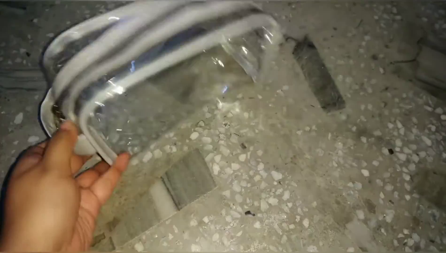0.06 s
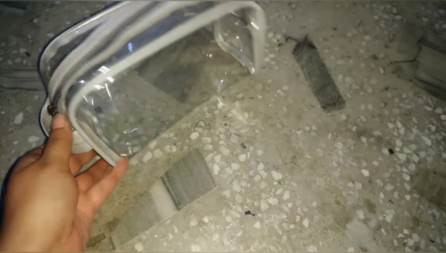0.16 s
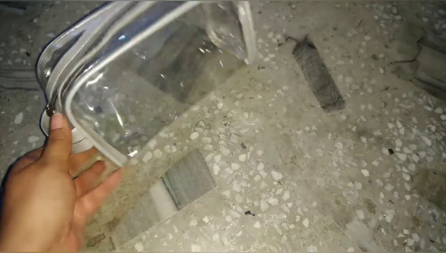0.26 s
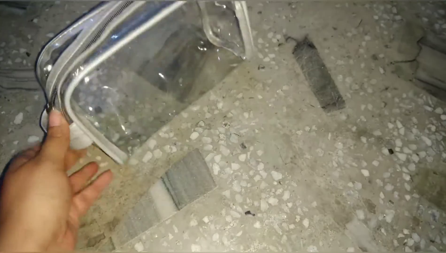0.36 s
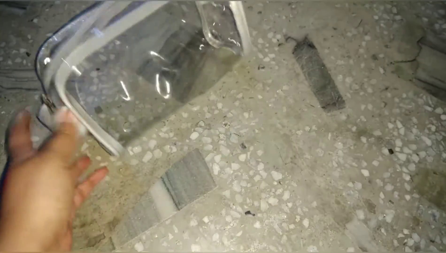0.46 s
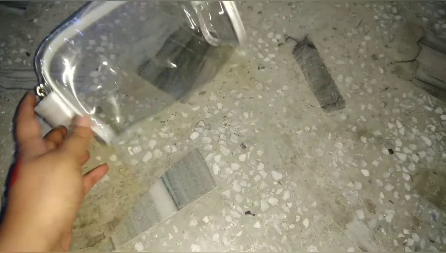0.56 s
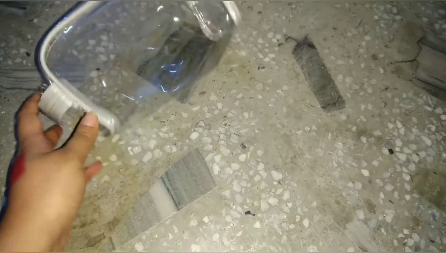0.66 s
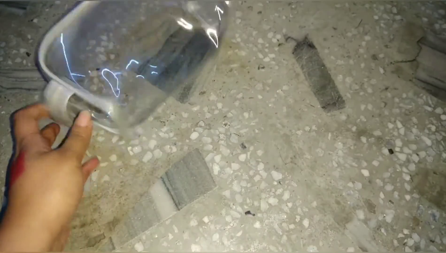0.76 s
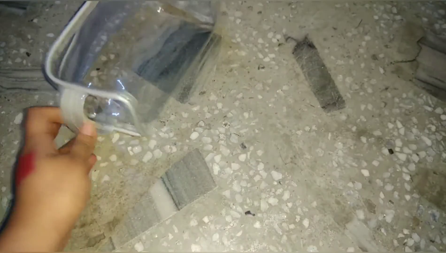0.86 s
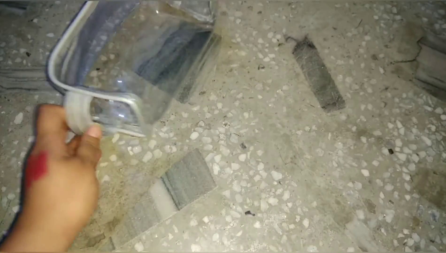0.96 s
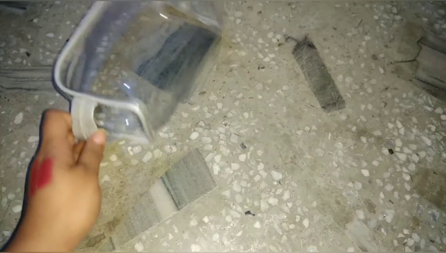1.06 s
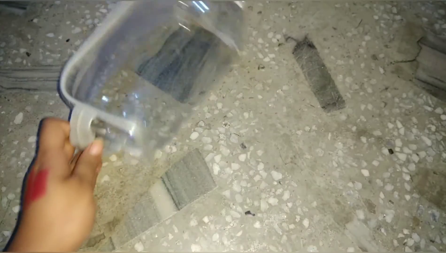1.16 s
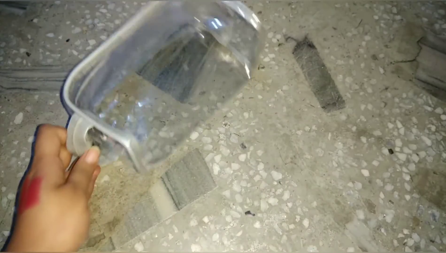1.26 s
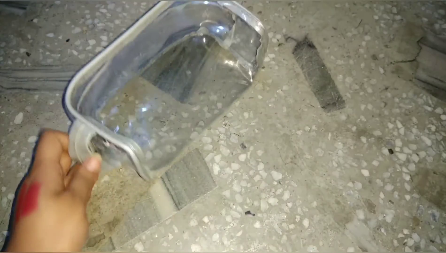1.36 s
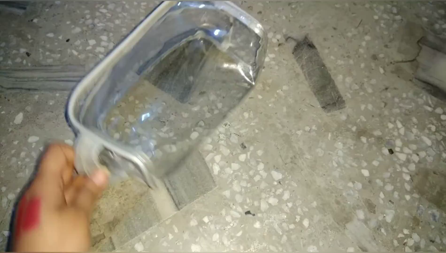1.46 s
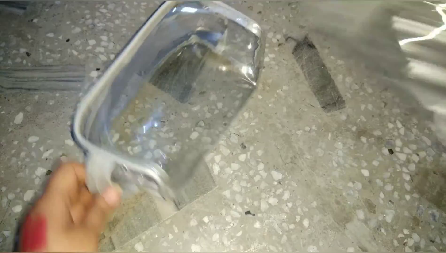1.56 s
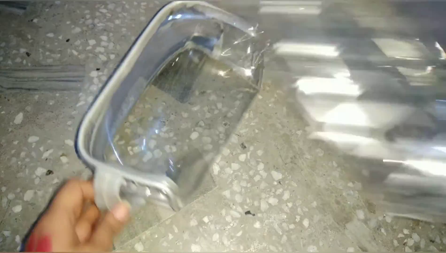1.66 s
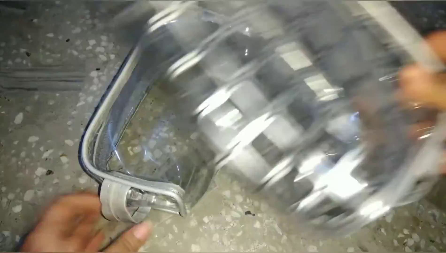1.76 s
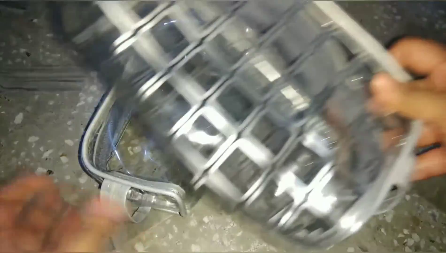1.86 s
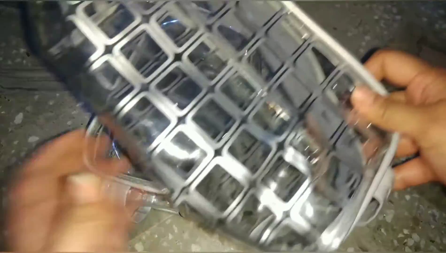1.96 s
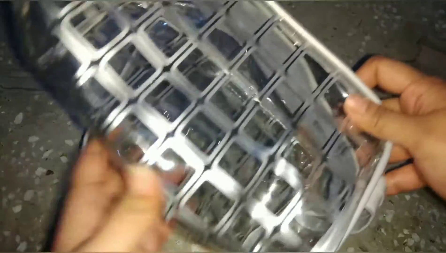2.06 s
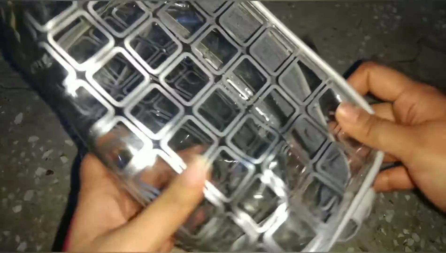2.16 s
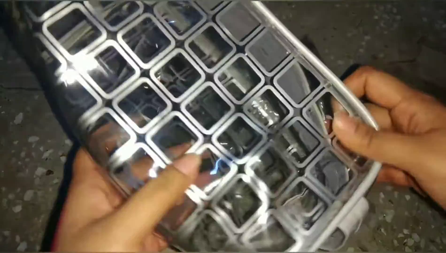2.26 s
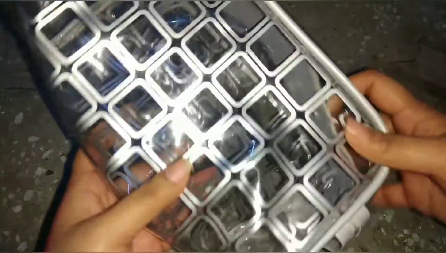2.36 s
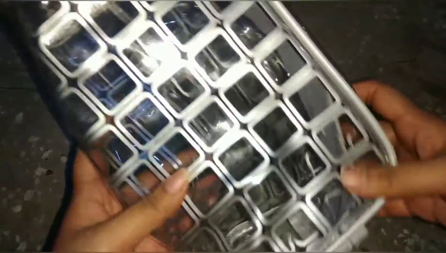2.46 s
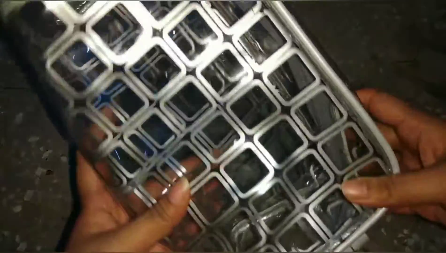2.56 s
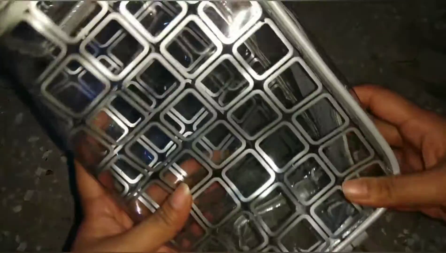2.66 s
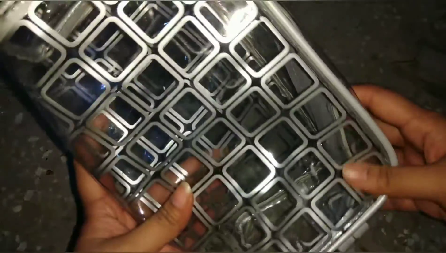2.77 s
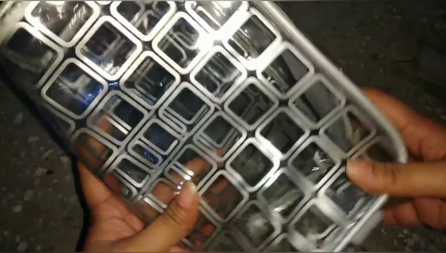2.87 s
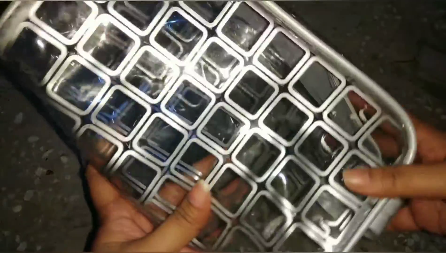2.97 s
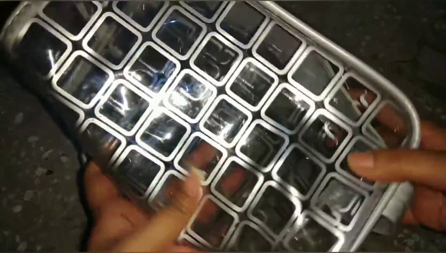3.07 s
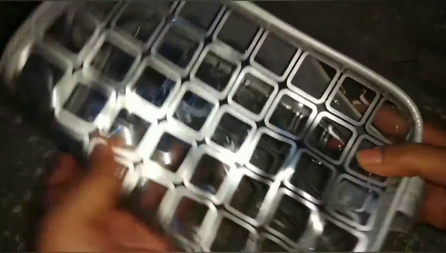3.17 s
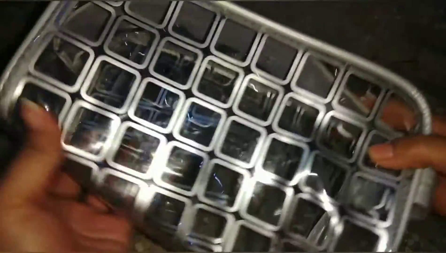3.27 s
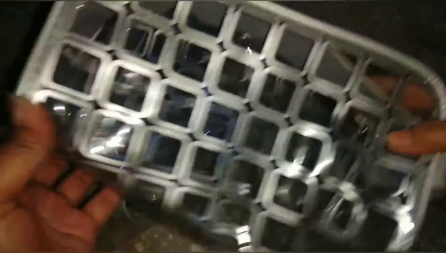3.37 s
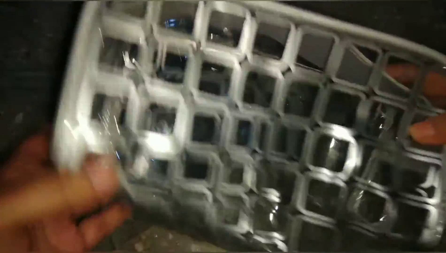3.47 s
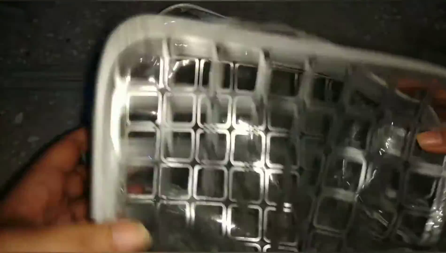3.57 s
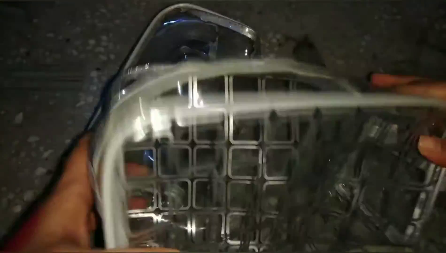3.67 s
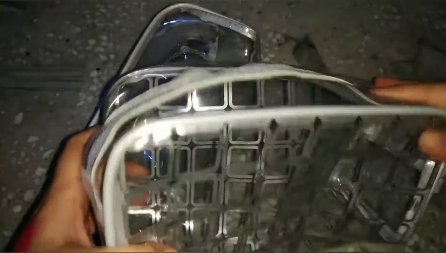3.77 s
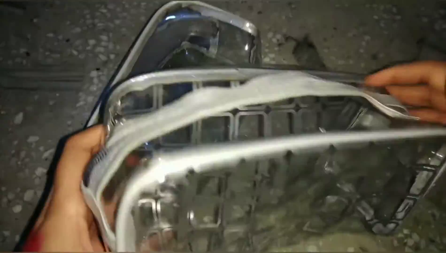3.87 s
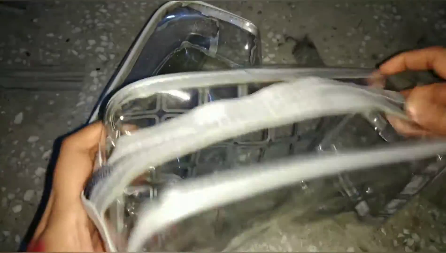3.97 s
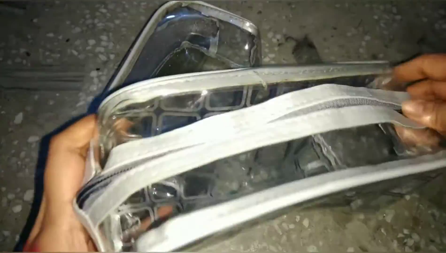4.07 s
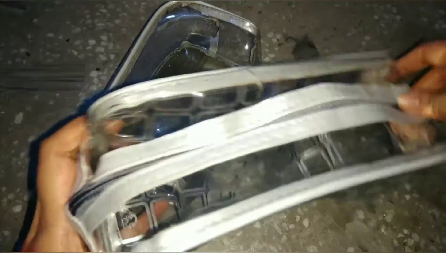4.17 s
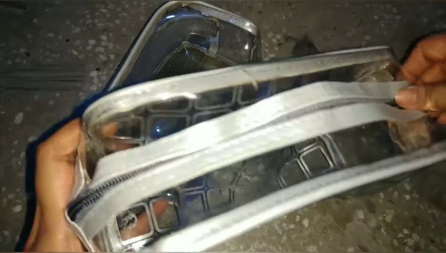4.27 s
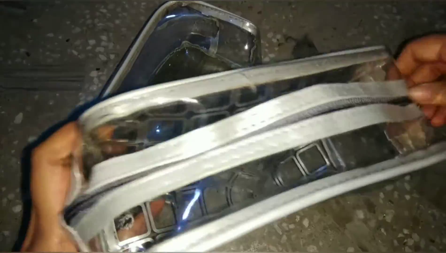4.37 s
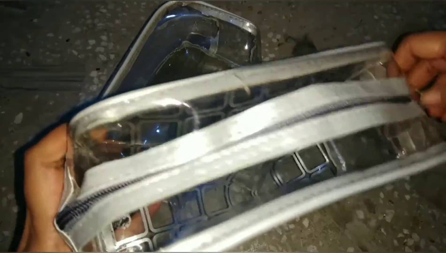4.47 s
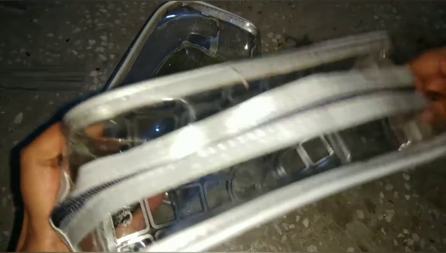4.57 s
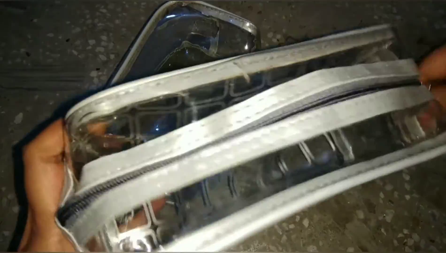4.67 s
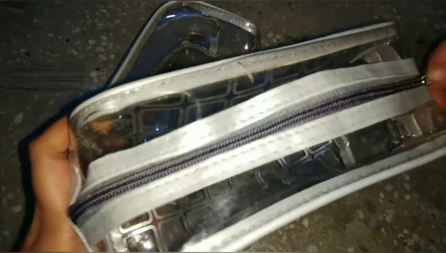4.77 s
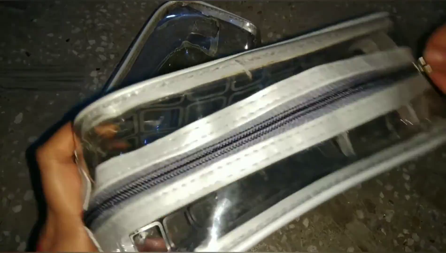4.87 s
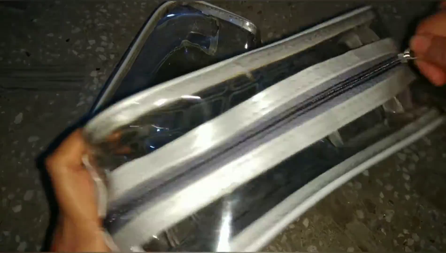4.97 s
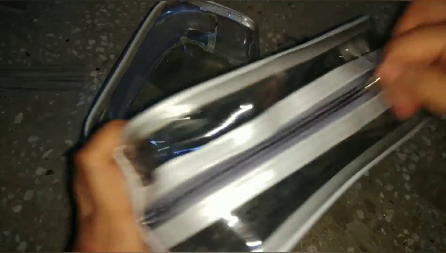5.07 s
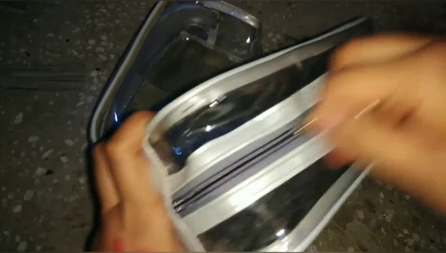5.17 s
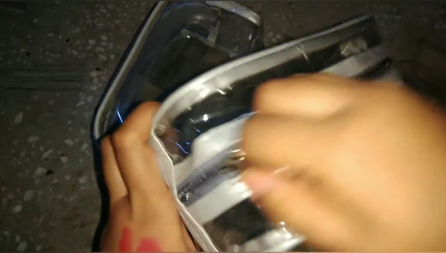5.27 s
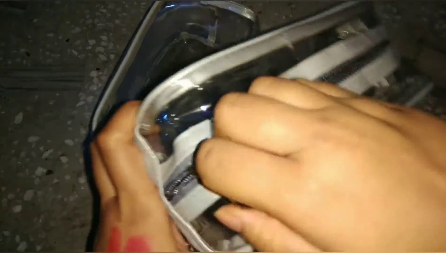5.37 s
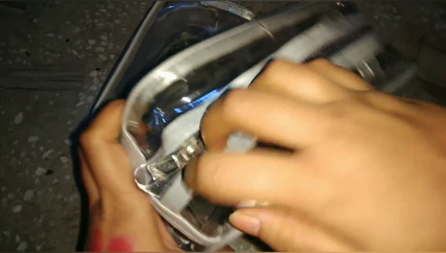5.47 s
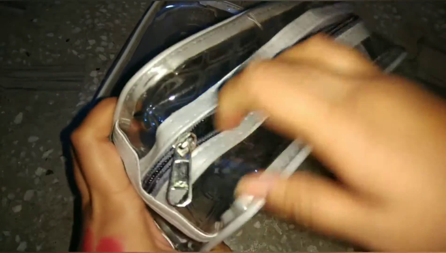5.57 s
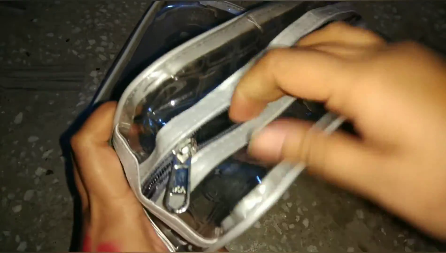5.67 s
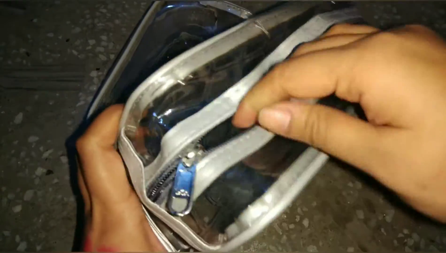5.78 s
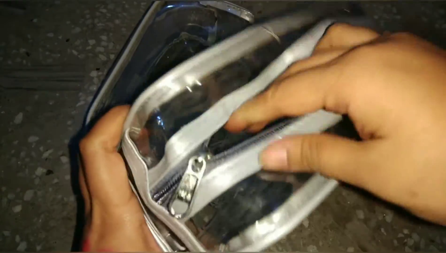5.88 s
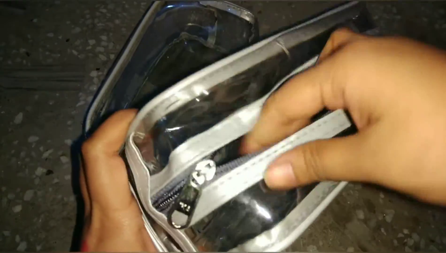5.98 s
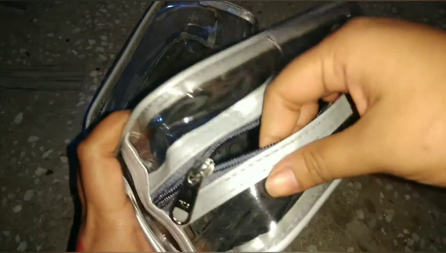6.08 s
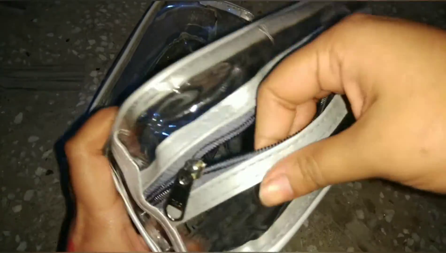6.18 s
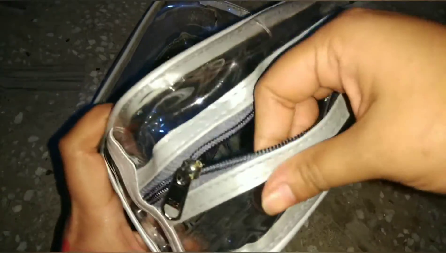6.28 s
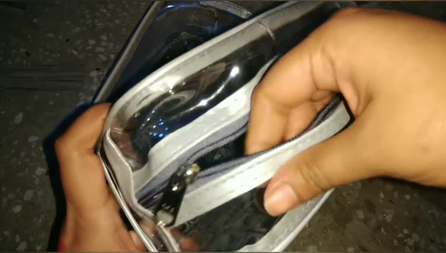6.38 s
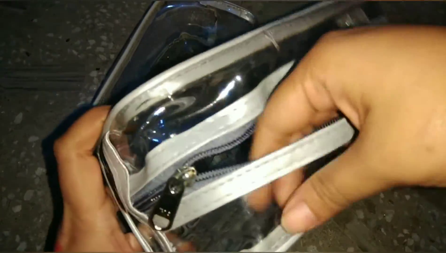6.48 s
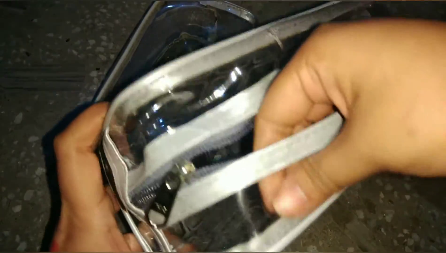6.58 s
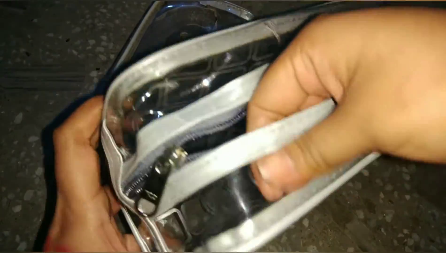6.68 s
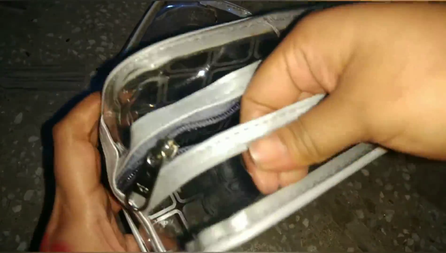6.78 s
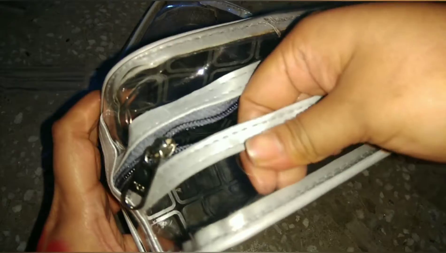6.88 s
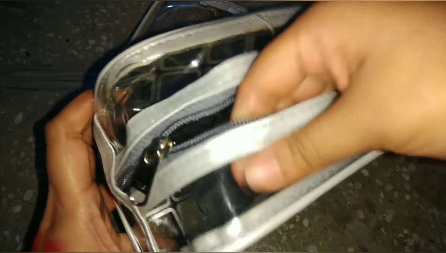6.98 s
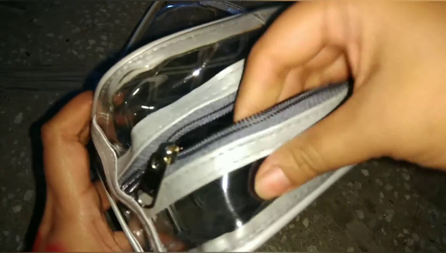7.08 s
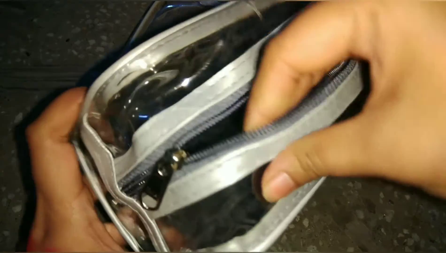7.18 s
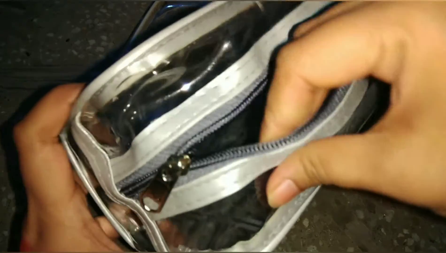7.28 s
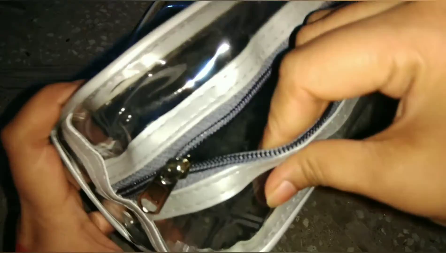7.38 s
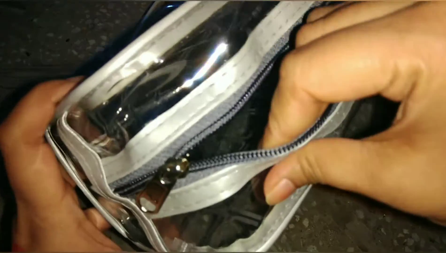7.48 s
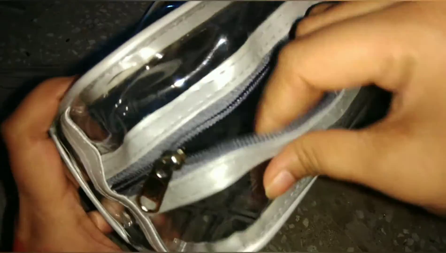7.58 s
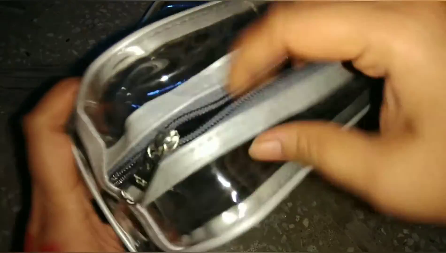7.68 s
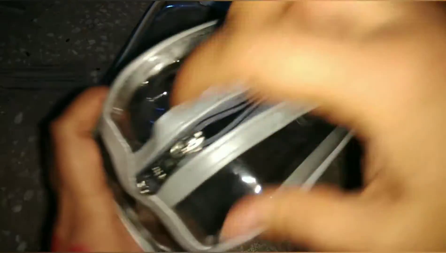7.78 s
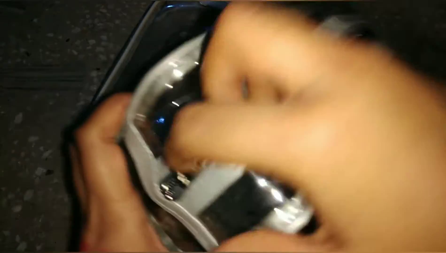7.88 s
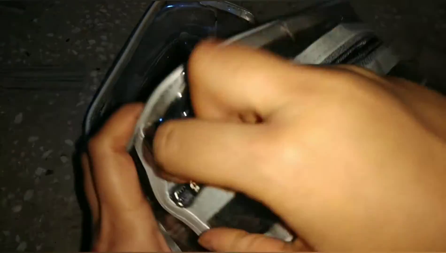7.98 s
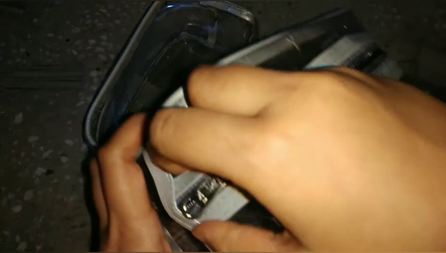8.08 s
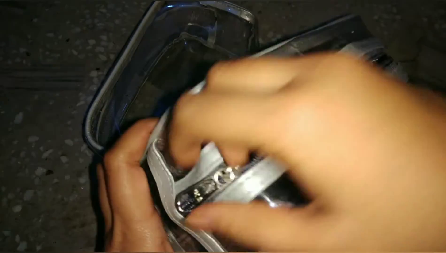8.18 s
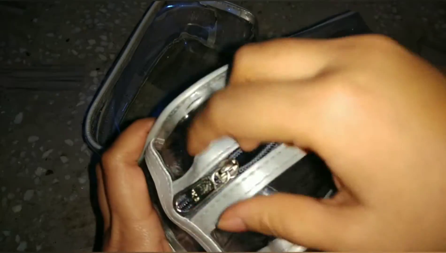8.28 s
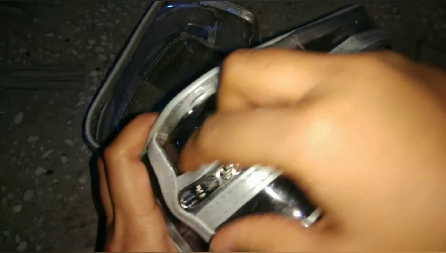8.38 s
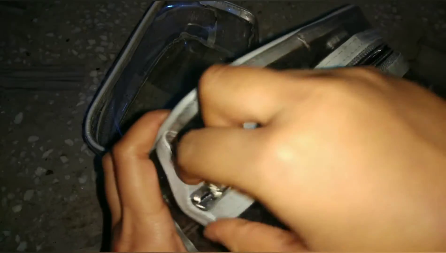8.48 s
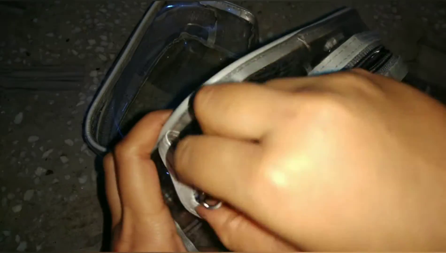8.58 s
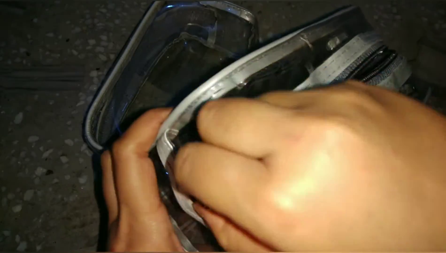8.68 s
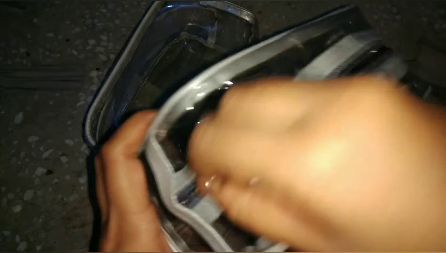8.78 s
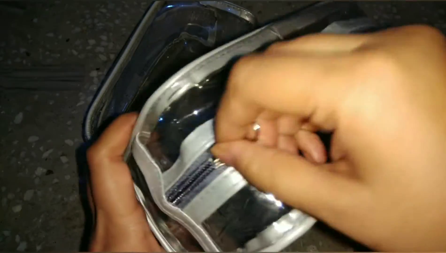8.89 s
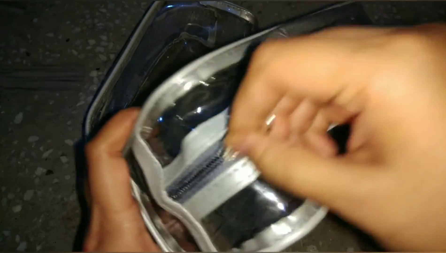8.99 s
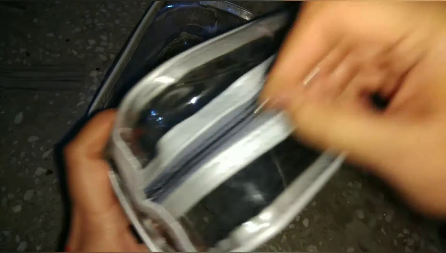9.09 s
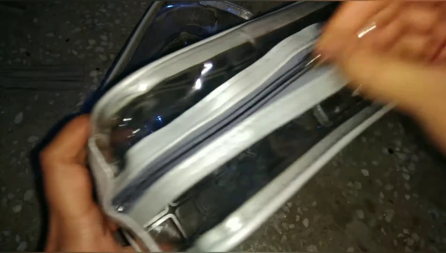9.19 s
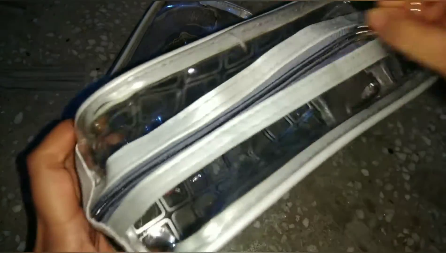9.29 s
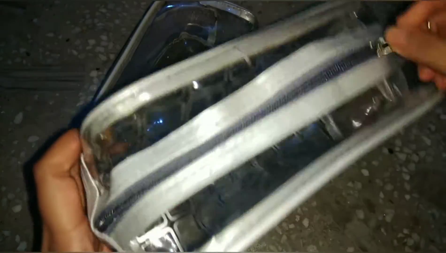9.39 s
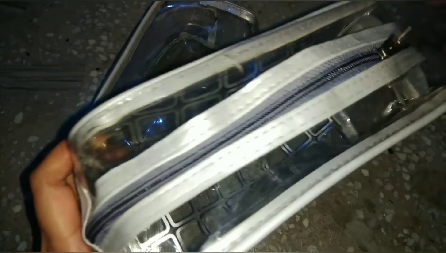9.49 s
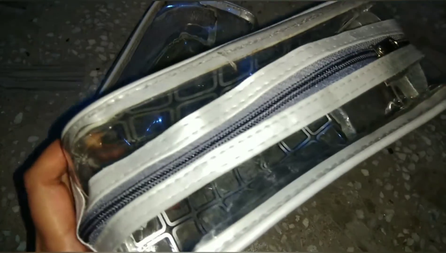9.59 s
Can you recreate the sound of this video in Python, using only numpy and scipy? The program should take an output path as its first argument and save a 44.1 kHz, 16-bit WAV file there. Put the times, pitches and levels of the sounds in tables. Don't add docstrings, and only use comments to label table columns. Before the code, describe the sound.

Very close in a quiet small room, stiff plastic film crackles as a pouch is put down, then rustles more softly as another is turned over. A metal pull tab clinks, the zip buzzes open in a brief rising pull, fingers tap and crease the walls, and a second quick zip buzz closes it near the end. Stereo phone pickup, with the background sinking almost to silence between moves.

```python
import sys
import numpy as np
from scipy import signal
from scipy.fft import rfft, irfft, next_fast_len
from scipy.io import wavfile
from scipy.ndimage import uniform_filter1d, map_coordinates

SR = 44100
rng = np.random.default_rng(int(sys.argv[2]) if len(sys.argv) > 2 else 0)


def how_loud(loudness_db):
    steps = np.asarray(loudness_db, float) / 20
    return 10 ** steps


def master(y):
    cut = np.clip(np.atleast_2d(y).T, -1, 1)
    pcm = np.round(cut * 32767)
    wavfile.write(sys.argv[1], SR, pcm.astype(np.int16))


N = 425565
TIME = np.arange(N) / SR
FAST = next_fast_len(N)


def level(x, db=0):
    return x * how_loud(db) / np.sqrt(np.mean(x ** 2))


def colour(x, points, weight=lambda hz: 1):
    hz = np.arange(FAST // 2 + 1) * SR / FAST + 1e-3
    at, db = np.transpose(points)
    gain = how_loud(np.interp(np.log(hz), np.log(at), db, -120, -120))
    return irfft(rfft(x, FAST) * gain * weight(hz), FAST)[..., :N]


def resonance(x, hz, width):
    return signal.lfilter(*signal.iirpeak(min(hz, .45 * SR), max(hz / width, .3), fs=SR), x)


def pair(alike_hz, apart=0.9):
    mid, side = rng.standard_normal((2, N))
    side = signal.sosfilt(signal.butter(1, alike_hz, "high", fs=SR, output="sos"), side)
    return mid + apart * side * np.array([[1], [-1]])


def sides(pan_db):
    return how_loud(np.array([pan_db, -pan_db]) / 2).reshape(2, -1)


def walk(rate):
    k = int(SR / rate)
    steps = np.repeat(rng.standard_normal(N // k + 1), k)
    return 1.2 * uniform_filter1d(steps, k)[:N]


def add(out, x, s):
    i = int(s * SR)
    out[:, i:i + x.shape[1]] += x[:, :N - i]


# t/s, left minus right level/dB
HOLDING_SIDE = [(0, -1), (.5, 11), (.8, 1), (1.7, 5), (2.1, 8), (2.9, 11), (3.2, 9), (4.0, 6.5), (4.55, 7),
                (4.9, 4), (5.55, 0), (5.9, 3), (7.5, 1.5), (8.3, -4.5), (8.6, 1), (9.3, 0.5), (9.65, 15.5)]


def held(s):
    return np.interp(s, *np.transpose(HOLDING_SIDE))


# f/Hz, level/dB per Hz
DRONE_SPECTRUM = [(18, -71), (30, -30), (69, -24), (92, -13.5), (119, -15), (135, -9), (165, -7), (190, 0),
                  (212, -3), (226, -14.5), (420, -26.5), (550, -68.5)]
# t/s, level/dB
GATE_OPENING = [(0.0, -68), (0.54, -69.5), (1.15, -67.5), (3.17, -71.5), (4.7, -69.5), (5.4, -62.5),
                (5.64, -69), (6.42, -72.5), (8.19, -66.5), (8.38, -74.5), (9.14, -67.5), (9.65, -69.5)]


def drone(flex_db):
    gate_slope, gate_s, trim_db = 0.19, 0.028, 6.5
    air = pair(70, apart=.5)
    handling_db = uniform_filter1d(flex_db, int(gate_s * SR)) + 68.5
    db = np.interp(TIME, *np.transpose(GATE_OPENING)) + gate_slope * handling_db
    waver_db = 1.4 * walk(12)
    return level(colour(air, DRONE_SPECTRUM)) * sides(-2.5) * how_loud(db + trim_db + waver_db)


# t/s of the peak, crackle level/dB, rise/s, fall/s, wall flex against crackle level/dB
SETTING_DOWN = [
    (0.0, -46.5, .1, 0.12, -5.5),
    (.2, -53.5, 0.11, .1, -2),
    (.38, -57, 0.064, 0.12, 2),
    (.54, -55, 0.12, 0.55, -2.5),
    (0.734, -40.5, 0.038, 0.13, -1.5),
    (.8, -48.5, 0.092, 0.35, -1),
    (1.05, -38, 0.13, 0.14, -21),
    (1.17, -42.5, 0.32, 0.18, -5.5),
    (1.519, -41, 0.38, 0.28, -8),
    (1.9, -75, 0.14, 0.66, 5),
]
TURNING_OVER = [(2.17, -62, 0.22, 0.32, -0.5), (2.32, -67.5, 0.048, 0.085, 7),
                (2.499, -78, 0.095, 0.064, 10), (3.0, -64.5, 0.057, 0.08, -5),
                (3.177, -60, 0.056, 0.07, -5), (3.3, -69.5, 0.33, 0.1, -6.5),
                (3.45, -71, 0.078, 0.078, -1.5), (3.54, -61.5, 0.058, 0.14, -3.5),
                (3.62, -56.5, 0.092, 0.1, -9), (3.718, -59.5, .02, 0.033, -10),
                (3.81, -46.5, 0.06, 0.073, -7.5), (3.9, -57.5, 0.083, 0.25, -5),
                (4.051, -54, 0.046, 0.14, -6.5), (4.142, -51.5, 0.023, .13, -7),
                (4.37, -52.5, 0.12, 0.085, -4), (4.58, -55, 0.16, 0.2, -0.5), (4.72, -63, .1, .09, 3)]
FINGERING = [(5.33, -49.5, 0.57, 0.069, 7.5), (5.43, -48.5, 0.11, 0.12, -1.5),
             (5.539, -50.5, 0.077, 0.21, 1), (5.922, -57.5, 0.31, 0.17, 1), (6.222, -64.5, 0.13, 0.11, 5),
             (6.434, -50, 0.049, 0.04, -2), (6.47, -60, 0.13, .12, -1.5), (6.671, -83, .03, 0.08, 1),
             (6.95, -55.5, 0.049, 0.1, -6.5), (7.0, -51.5, 0.08, 0.1, -5), (7.2, -63.5, 0.25, 0.095, -3.5),
             (7.619, -55.5, 0.036, 0.16, -3), (7.7, -70.5, 0.079, 0.12, 16.5),
             (7.869, -62, 0.094, 0.11, -2), (8.119, -66, 0.095, 0.091, -1.5),
             (8.21, -67.5, 0.12, 0.053, -4.5), (8.397, -67, 0.048, 0.12, -6), (8.561, -52, 0.046, 0.047, 3),
             (8.64, -52.5, .04, 0.041, -1.5), (8.72, -54, 0.078, 0.083, 5.5), (8.83, -65.5, 0.11, 0.097, 4),
             (9.38, -59, 0.67, 0.071, 6.5), (9.46, -52, 0.027, 0.095, 2), (9.6, -64.5, 0.59, 0.12, -3.5)]


def hands(shake_db, on):
    swell_db, swell_curve = 20, 1.55
    flex_slope, rustle_slope = 0.71, 0.92
    soft_loss = 0.28
    still_db, shake_share_db = np.array([-104, -110, -105]), np.array([[-16.], [-7.5], [0]])
    coarse = TIME[::64]
    shaken = (on * how_loud(2 * uniform_filter1d(shake_db, size=3000)))[::64]
    power = how_loud(2 * still_db)[:, None] + shaken * how_loud(2 * shake_share_db)
    for moves, rustle_db in zip((SETTING_DOWN, TURNING_OVER, FINGERING), (-7, -6, -3)):
        for s, db, rise, fall, flex_db in moves:
            late = coarse - s
            pace = np.where(late < 0, max(rise, .01), max(fall, .01))
            fade = swell_db * np.abs(late / pace) ** swell_curve
            flex = db + flex_db - flex_slope * fade
            rustle = db + rustle_db + soft_loss * (db + 49.0) - rustle_slope * fade
            power += how_loud(2 * np.array([flex, rustle, db - fade]))
    return [np.interp(TIME, coarse, 10 * np.log10(p)) for p in power]


def patchy(x, depth_db, band_hz, hold_s):
    hz, s, cells = signal.stft(x, SR, nperseg=512)
    field = rng.standard_normal((200, 800))
    at = np.meshgrid(hz / band_hz, s / hold_s, indexing="ij")
    gain = how_loud(depth_db * map_coordinates(field, at, order=1, mode="wrap"))
    return signal.istft(cells * gain, SR, nperseg=512)[1][:, :N]


# f/Hz, level/dB per Hz
FILM_SPECTRUM = [(150, -34), (260, 0.5), (658, -0.5), (836, -2), (1430, -12.5), (1810, -9.5), (2470, -11.5),
                 (2740, -11), (3360, -12), (4070, -11.5), (6470, -12.5), (12600, -3), (15800, -8)]


def film(layers_db, tooth):
    slips = (rng.random(N) < 600 / SR) * how_loud(np.minimum(4.7 * rng.exponential(size=N), 11))
    grain = 18.0 + signal.lfilter([1], [1, -np.exp(-1 / (0.014 * SR))], slips)
    low, high = (lambda hz, e=e: 1 / (1 + (hz / e) ** 9) for e in (994, 6700))
    shares = [low, lambda hz: high(hz) - low(hz), lambda hz: 1 - high(hz)]
    out = 0
    for share, db, trim_db, pan in zip(shares, layers_db, (-3, 2.5, 0), (0.055, 0.36, 1)):
        noise = pair(1220, apart=1.0) * level(grain) * tooth
        layer = colour(noise, FILM_SPECTRUM, lambda hz: np.sqrt(share(hz)))
        out = out + level(layer, trim_db) * how_loud(db + 0.98 * walk(25)) * sides(pan * held(TIME))
    return patchy(out, depth_db=4.5, band_hz=130, hold_s=.05)


def crinkles(flex_db, on):
    count, middle_hz, turns = 1100, 1300, 2
    out, t = np.zeros((2, N)), TIME[:500]
    for when, big, pitch, pan in rng.random((count, 4)):
        i = int(when * N)
        hz = middle_hz * 2 ** (2.4 * pitch - 1.1)
        db = flex_db[i] - 3 * np.log(1 - .95 * big) - 3 * np.log2(hz / middle_hz)
        pop = np.sin(2 * np.pi * hz * t) * np.exp(-t * hz / turns)
        add(out, pop * how_loud(db) * (1 - on[i]) * sides(6 * pan - 3), i / SR)
    return signal.sosfilt(signal.butter(2, 400, "high", fs=SR, output="sos"), out)


# t/s, peak level/dB, wall pitch f/Hz, snap against thud level/dB
WALL_TAPS = [(0.164, -38.5, 314, -12), (0.166, -47, 700, -20), (0.385, -32.5, 380, -12),
              (.729, -26.5, 776, -3), (.731, -23, 430, -12), (0.804, -32, 460, 5), (1.033, -30.5, 835, 8),
              (1.069, -34, 1600, 8), (2.129, -41.5, 405, -14), (2.154, -39, 715, -10),
              (2.301, -50, 700, -19), (2.408, -96, 1600, -15), (2.443, -49.5, 742, -27),
              (2.501, -51.5, 750, -29), (2.879, -59.5, 740, -28.5), (2.994, -50, 366, -0.5),
              (3.136, -52, 560, -8), (3.428, -69.5, 304, 16), (3.525, -47.5, 700, -14),
              (3.545, -49, 800, -15), (3.8, -50, 850, 11), (4.135, -38.5, 720, 2.5),
              (4.371, -37.5, 480, -20), (4.517, -48, 734, -20), (4.571, -42.5, 755, 5.5),
              (4.626, -41, 674, -3), (4.626, -41, 1800, -10), (4.64, -40, 1800, -10),
              (4.822, -39, 800, -20), (5.287, -25, 427, -16), (5.288, -30, 900, -20),
             (5.348, -42, 690, -17), (5.436, -22.5, 430, -2.5), (5.521, -19, 970, -14),
             (5.521, -24.5, 332, -25.5), (5.526, -29, 1750, -5.5), (5.529, -29.5, 1510, -9),
             (5.537, -25, 1070, -9.5), (5.547, -33.5, 497, -6), (5.642, -31.5, 665, -23),
             (5.823, -41, 690, -10), (5.905, -42.5, 395, -0.5), (6.419, -36, 651, -3),
             (6.431, -29.5, 674, -7), (6.434, -36, 1300, -8), (7.624, -34.5, 388, -29.5),
             (7.652, -32, 680, -11), (7.775, -43.5, 346, -20), (7.968, -57, 306, -20),
             (8.542, -37, 1045, -16), (8.636, -29, 386, -6.5), (8.696, -30, 426, -21),
             (8.714, -36, 630, -19), (8.839, -38, 700, -10), (8.944, -28, 414, -17),
             (8.944, -47, 895, -20), (8.959, -26, 352, -16), (9.325, -25, 420, -25),
             (9.451, -27, 711, -13),
              (0.314, -50.5, 571, -15), (0.357, -53, 363, -15), (0.476, -51, 519, -20),
              (0.706, -33.5, 797, -12), (1.203, -30, 773, -17), (1.51, -30, 867, -15),
              (1.99, -74, 433, -15), (2.018, -62, 298, -15.5), (2.064, -51, 342, -14),
              (2.289, -52, 810, -17), (2.485, -55, 748, -23), (2.53, -60, 738, -22),
              (2.578, -71, 568, -15), (2.911, -60, 376, -19), (3.268, -78, 530, -15),
              (3.362, -75, 676, -13), (3.599, -64, 353, -17), (3.767, -54, 474, -17),
              (3.885, -51, 624, -15), (3.937, -48, 425, -12), (5.785, -42, 940, -12),
              (6.01, -49.5, 1010, -14), (6.119, -52, 428, -12.5), (6.152, -55, 673, -15),
              (6.183, -64, 735, -16), (6.206, -50, 694, -10.5), (6.381, -58, 754, -14.5),
              (6.754, -87, 301.7, -14), (6.862, -69, 359, -16), (6.885, -63, 310, -21),
              (6.941, -43.5, 689, -12), (7.584, -60.5, 301, -11), (7.601, -46, 603, -19.5),
              (7.818, -52, 300, -15.5), (8.072, -62, 412, -19), (8.124, -49, 418, -18),
              (8.378, -71, 660, -15), (8.405, -68, 353, -15), (8.502, -65, 336, -15),
              (9.495, -45, 458, -15)]


def taps():
    contact_s = .005
    out, t = np.zeros((2, N)), TIME[:1800]
    for s, db, hz, snap_db in WALL_TAPS:
        burst = rng.standard_normal((3, len(t))) * np.exp(-t / contact_s)
        burst[:, 0] += [8, 2.5, 2.5]
        thud = resonance(burst[0], hz, .24 * hz) + .3 * resonance(burst[0], 1.8 * hz, 2.2 * hz)
        snap = resonance(burst[1:], 5100, 7000)
        hit = thud / np.abs(thud).max() + how_loud(snap_db) * snap / np.abs(snap).max()
        add(out, hit * how_loud(db) * sides(-0.005), s)
    return out


# f/Hz, level/dB, time to fade 60 dB t60/s
TAB_MODES = [(15380, 0, .009), (15240, -19, .11), (15130, -23, .1), (14100, -5, .003), (12900, -3, .003),
             (11700, -2, .003), (10500, -4, .003), (9300, -7, .003), (8200, -8, .004), (6800, -12, .003),
             (5300, -17, .002), (3710, -21, .002)]
# t/s, peak level/dB, lower modes against top level/dB
TAB_CLINKS = [(.6669, -49, -18), (0.7047, -60, -2), (0.7796, -39, -16), (0.843, -44, -14),
              (2.128, -48, -10), (2.1869, -52, -14), (2.218, -48, 0), (2.2842, -46, -4),
              (2.4093, -51, -4), (2.445, -54, 4), (2.4673, -61, -1), (2.5278, -60, -5),
              (2.578, -55.5, -1.5), (2.9128, -45, -10), (2.946, -44, -25), (3.53, -56, -20),
              (4.135, -31, 3), (4.138, -28.5, -3), (4.144, -31, 9), (4.149, -25, -2), (4.5151, -51, 5),
              (4.548, -47.5, 10), (4.565, -29.5, 3), (4.616, -30.5, 2), (4.567, -26.5, 2),
              (4.5717, -15.5, -1), (4.6183, -11.5, -2), (4.624, -25, 2), (4.6384, -34, 5),
              (4.8209, -43, 15), (5.2949, -38, -16), (5.3892, -51, -8), (5.4205, -28, 2),
                  (5.4345, -22, 4), (5.4385, -17.5, 4), (5.441, -22, 3), (5.5215, -15, -4),
                  (5.5242, -10.5, -5.5), (5.538, -24, -18.5), (5.562, -34.5, -10), (5.72, -55, -26),
                  (7.6443, -42.5, -21), (7.6685, -35, -15), (7.6954, -41, 2), (7.835, -44, -13),
                  (7.975, -58, 4), (8.112, -38.5, -5), (8.5445, -43, -22), (8.565, -46, 2),
                  (8.5879, -51, -11), (8.6364, -36, -3), (8.7116, -46, 0), (8.765, -54, 2),
                  (8.8383, -53, -15), (8.946, -41, -16), (9.452, -34, -3), (9.4552, -11, -6),
                  (9.458, -17, -7.5)]


def clinks():
    scuff_s, scuff_db, rattle_s = .005, -16, .0013
    out, t = np.zeros((2, N)), TIME[:4096]
    hz, mode_db, t60 = np.transpose(TAB_MODES)[:, :, None]
    since = t[:700] - scuff_s
    contact = np.where(since < 0, how_loud(scuff_db) * t[:700] / scuff_s, np.exp(-np.abs(since) / rattle_s))
    strike = 1.8 * (np.arange(700) == int(scuff_s * SR))
    for s, db, lower_db in TAB_CLINKS:
        turn = rng.random((2, len(TAB_MODES), 1))
        gain = how_loud(mode_db + np.where(hz < 14500, lower_db, 0) + 2 * rng.standard_normal(hz.shape))
        ring = np.sum(gain * np.sin(2 * np.pi * (hz * t + turn)) * how_loud(-60 * t / t60), axis=1)
        ring *= np.sin(np.pi / 2 * np.minimum(t / .0004, 1)) ** 2
        hit = signal.fftconvolve(ring, (contact * rng.standard_normal(700) + strike)[None])
        peak = np.abs(resonance(hit, TAB_MODES[0][0], 2900)).max()
        add(out, hit / peak * how_loud(db + 0.5) * sides(1.5 * held(s)), s - scuff_s)
    return out


# t/s, teeth per second f/Hz, level/dB, octave against tooth tone level/dB,
# knock against buzz level/dB
OPENING_PULL = [
    (4.815, 163.1, -63.5, -5.5, -8.5),
    (4.839, 186, -43, 6, -1),
    (4.935, 215, -43.5, 8.5, 1),
    (4.966, 313.9, -40.5, 12.5, -5),
    (4.995, 391.9, -36, 14.5, -7),
    (5.015, 435.1, -36.5, 2, -12),
    (5.072, 494, -38.5, 5, -3),
    (5.094, 476, -36.5, 5, -3),
]
OPENING_SLOWS = [
    (5.116, 434, -36.5, -2, -8),
    (5.14, 420.9, -33.5, -8, -7.5),
    (5.166, 431, -34, -1, -4),
    (5.184, 415, -34.5, -1.5, -7.5),
    (5.22, 310.9, -36.5, -2, -8),
    (5.26, 186, -41.5, 8, -6.5),
]
CLOSING_PULL = [
    (8.968, 175, -41, 2, -5),
    (9.004, 208, -34, -8, -5),
    (9.05, 285, -35, -10, -9),
    (9.09, 318, -44, -2, -8),
]
CLOSING_RUN = [
    (9.106, 332, -31.5, 2, -16),
    (9.13, 352, -30, -5, -16),
    (9.152, 343, -30.5, -36, -11),
    (9.19, 345, -30.5, -12, -13),
    (9.222, 348, -29.5, -26, -10),
    (9.234, 300, -34, 12, -7),
    (9.276, 296, -37, 3, -3),
    (9.292, 195, -38, -8, -5),
    (9.314, 190, -40, -6, -6),
]


def slider():
    strokes = OPENING_PULL + OPENING_SLOWS, CLOSING_PULL + CLOSING_RUN
    rows, on = [], 0
    for stroke, smooth, stumble, shake_db in zip(strokes, (.15, .1), (.55, 1.35), (-2, -10)):
        s, hz, db, octave_db, knock_db = np.transpose(stroke)
        rough = smooth + stumble * (1 - hz / hz.max())
        rows.append([s, hz, db, rough, octave_db, knock_db, db + shake_db])
        on = on + (TIME >= s[0]) * (TIME < s[-1] + .005)
    s, *columns = np.hstack(rows)
    return [np.interp(TIME, s, c) for c in columns] + [uniform_filter1d(1. * on, size=300)]


# f/Hz, width f/Hz, level/dB
WALL_MODES = [(214, 79, -5), (378, 100, 0), (700, 190, -2), (1100, 170, -4), (1600, 160, -9)]
# f/Hz, width f/Hz, level/dB
TAPE_MODES = [(640, 380, 1), (1020, 350, -1), (1650, 500, -2), (2600, 1600, -2)]


def teeth(hz, db, rough, octave_db, knock_db, on):
    rough = np.clip(rough, 0, 1)
    wobble_db = .3 * walk(70)
    turns = np.cumsum(hz * how_loud(wobble_db + 9 * rough ** 2 * walk(250))) / SR
    size = how_loud((2.0 + 1.1 * rough) * rng.standard_normal(N // 40)[turns.astype(int)])
    sharp = np.clip(3.4 + .09 * octave_db, 2, 3.8)
    swing = sharp * np.cos(2 * np.pi * turns)
    second = np.tanh((octave_db + 5 * walk(40) + 3.0) / 15)
    push = (np.exp(swing) + second * np.exp(-swing)) / np.exp(sharp)
    scrape = (.4 + 2.6 * rough) * pair(600)
    drive = size * (push - uniform_filter1d(push, size=400) + push * scrape)
    wall = sum((-1) ** k * how_loud(g) * resonance(drive, f, w) for k, (f, w, g) in enumerate(WALL_MODES))
    even = np.sqrt(uniform_filter1d(np.mean(wall ** 2, axis=0), size=1200))

    flare = size * push
    rasp = resonance(resonance(flare * pair(900), 1600, 1400), 1600, 1400)
    rasp_db = -10.5 + 0.2 * octave_db + .4 * (knock_db + 7.5)
    wall = wall + how_loud(rasp_db) * even * level(rasp)

    sharpness_hz, slow_hz = 2200, 330
    knock = size * np.exp((sharpness_hz / hz) ** 2 / 2 * (swing / sharp - 1))
    slow = np.clip((slow_hz - hz) / 90, .15, 1)
    tape = 0
    for k, (f, w, g) in enumerate(TAPE_MODES):
        mode = how_loud(g + 4 * walk(45)) * resonance(knock, f, w)
        tape = tape + (-1) ** k * mode * (1 if k else slow)
    wall = wall + how_loud(knock_db) * even * tape / np.sqrt(uniform_filter1d(tape ** 2, size=1200) + 1e-12)

    buzz = -wall / even * how_loud(db + 0.5 * walk(45)) * on * sides(-0.52)
    film_flare = 1 + on * 0.029 * (flare / uniform_filter1d(flare, size=1200) - 1)
    return buzz, film_flare


def scene():
    *control, shake_db, on = slider()
    buzz, tooth = teeth(*control, on)
    layers_db = hands(shake_db, on)
    hits = clinks() + taps() + crinkles(layers_db[0], on)
    room_t60_s, room_db, buzz_room_db = .18, -14, -1
    t = TIME[:SR // 4]
    tail = rng.standard_normal((2, len(t))) * how_loud(-60 * t / room_t60_s) * (t > .004)
    tail = tail / np.sqrt(np.sum(tail ** 2) / 2)
    room = signal.fftconvolve(hits + how_loud(buzz_room_db) * buzz, tail, axes=1)[:, :N]
    left, right = hits + buzz + how_loud(room_db) * room + film(layers_db, tooth) + drone(layers_db[0])
    lag = 6.0 - 1.155 * held(TIME)
    return np.array([map_coordinates(left, [np.arange(N) - lag], order=3), right])


def shut_weak_bands(x):
    shut_db, low_hz, high_hz, spared_db = -2.45, 2200, 11500, 5
    hz, _, cells = signal.stft(x, SR, nperseg=1024)
    power = np.mean(np.abs(cells) ** 2, axis=0)
    power = uniform_filter1d(uniform_filter1d(power, size=4, axis=0), size=2, axis=1)
    power = np.log(power + 1e-20)
    sunk = power - uniform_filter1d(power, size=40, axis=0) < np.log(how_loud(2 * shut_db))
    sunk = uniform_filter1d(uniform_filter1d(1. * sunk, size=2, axis=0), size=4, axis=1) > .2
    inside = (hz > low_hz) & (hz < high_hz)
    loud = power[inside].mean(axis=0)
    calm = loud - uniform_filter1d(loud, size=9) < np.log(how_loud(spared_db))
    gain = np.where(sunk & inside[:, None] & calm, .03, 1)
    return signal.istft(cells * gain, SR, nperseg=1024)[1][:, :N]


def roll_off(x):
    return signal.sosfilt(signal.butter(12, 16820, fs=SR, output="sos"), x)


def record(dry):
    hiss_db, top_hz = -89.5, 15950
    x = dry + how_loud(hiss_db) * resonance(rng.standard_normal(dry.shape), 6000, 14000)
    x = signal.sosfilt(signal.ellip(6, .2, 40, top_hz, fs=SR, output="sos"), x)
    return roll_off(shut_weak_bands(x))


dry = scene()
out = record(dry)
master(out)
```